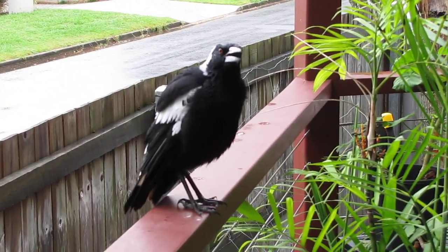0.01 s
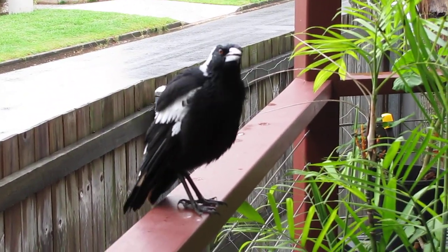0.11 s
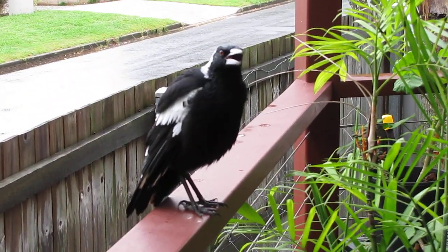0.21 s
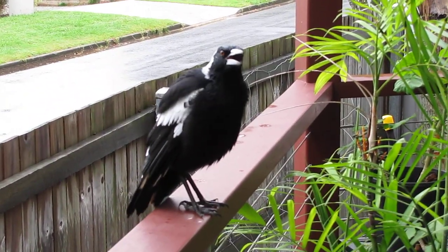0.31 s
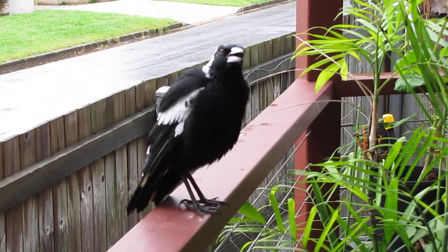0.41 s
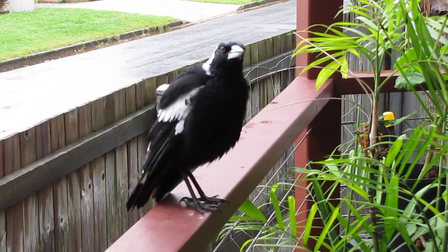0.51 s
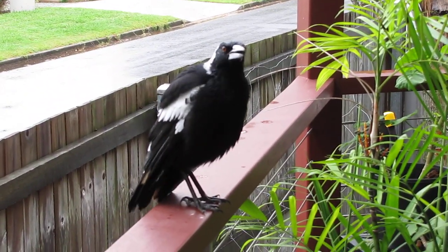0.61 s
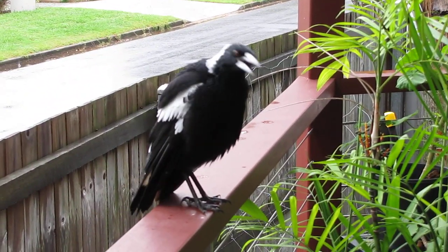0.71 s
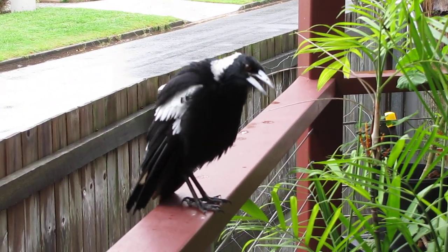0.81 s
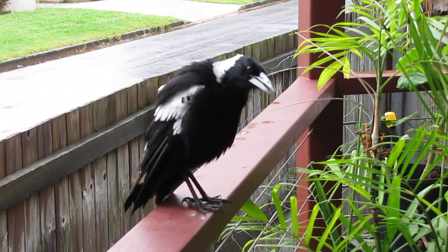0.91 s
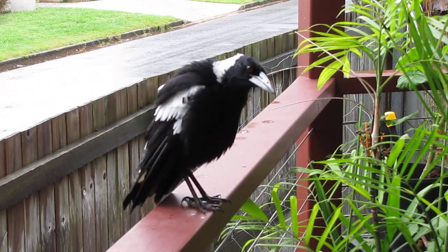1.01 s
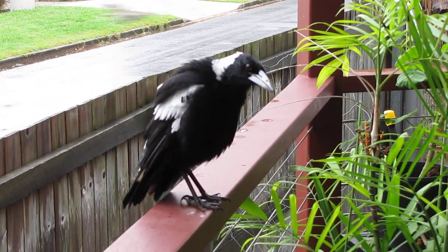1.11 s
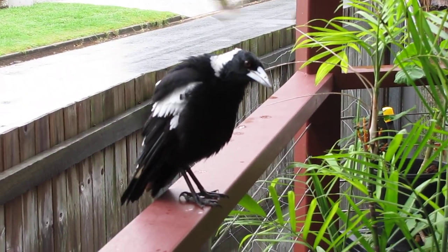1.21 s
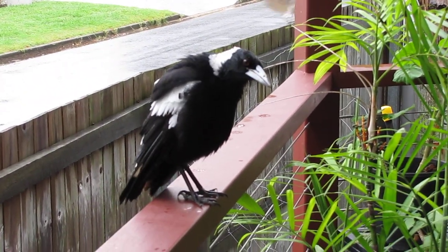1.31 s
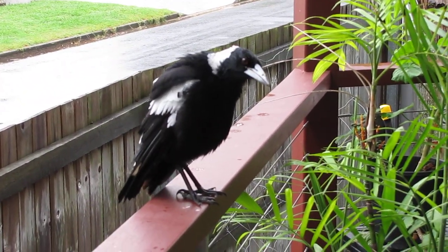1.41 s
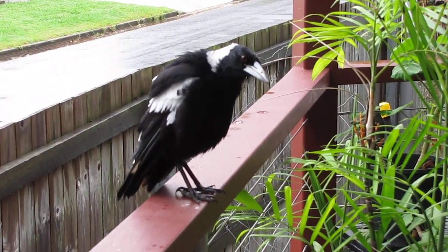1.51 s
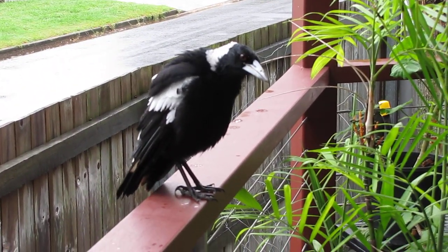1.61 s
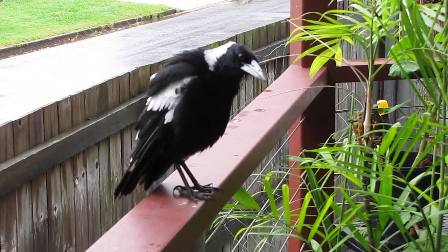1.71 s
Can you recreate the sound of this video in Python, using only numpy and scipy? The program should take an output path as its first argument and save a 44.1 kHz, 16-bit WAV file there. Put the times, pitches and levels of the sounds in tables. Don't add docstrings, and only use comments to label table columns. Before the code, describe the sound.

A magpie close by gives two loud falling whistles after the fading tail of a harsh call; then a further bird answers with four quiet rising chirps amid drips, light rain and distant traffic, in stereo outdoors.

```python
import sys
import numpy as np
from scipy import signal
from scipy.fft import rfft, irfft, next_fast_len
from scipy.io import wavfile
from scipy.ndimage import uniform_filter1d, map_coordinates

SR = 44100
rng = np.random.default_rng(int(sys.argv[2]) if len(sys.argv) > 2 else 0)


def to_wav(s):
    ch = np.atleast_2d(s).T
    pcm = np.round(np.clip(ch, -1, 1) * 32767)
    wavfile.write(sys.argv[1], SR, pcm.astype(np.int16))


def gain_from_db(level_db):
    decades = np.asarray(level_db, float) / 20
    return 10 ** decades


N = 79380


def unit(x):
    return x / np.sqrt(np.mean(x ** 2) + 1e-20)


def along(points, hz):
    f, value = np.transpose(points)
    return np.interp(np.log(hz + 1), np.log(f + 1), value)


def wobble(rate):
    return map_coordinates(rng.standard_normal(800), [np.arange(N) * rate / SR], mode="wrap")


def filtered(x, response):
    m = next_fast_len(N + SR // 2)
    return irfft(rfft(x, m) * response(np.fft.rfftfreq(m, 1 / SR)), m)[..., :N]


def cycles(hz):
    return 2 * np.pi * np.cumsum(hz) / SR


# f/Hz, level/dB per Hz
BREATH = [(900, -18), (2000, -3.5), (3500, -3), (5900, 0), (7500, -6), (12500, -18.5), (14500, -24),
          (16000, -36)]


def breath_noise():
    return unit(filtered(rng.standard_normal(N), lambda f: gain_from_db(along(BREATH, f))))


# t/s, f/Hz, level/dB, breath level/dB
NOTES = [
    [(0.172, 2438, -30, -39), (0.18, 2407, -22.5, -20), (0.2, 2389, -25.5, -14.5),
     (0.234, 2399, -16.5, -31), (0.258, 2338, -10.5, -34.5), (0.318, 2265, -11.5, -30.5),
     (0.342, 2189, -11.5, -47), (0.368, 2130, -12.5, -50)],
    [(.37, 2097, -22.5, -45), (.383, 2049, -12.5, -41), (.392, 2019, -9, -46), (.402, 2006, -11.5, -51),
     (.417, 1950, -13.5, -55), (.426, 1949, -12.5, -54), (.433, 1929, -24, -42), (.437, 1940, -46, -40)],
    [(.627, 2420, -32.5, -17), (.636, 2379, -32, -20), (.642, 2370, -38, -8), (.65, 2343, -25, -23),
     (.668, 2330, -21.5, -23), (.695, 2300, -18.5, -49), (.735, 2239, -14.5, -54), (.76, 2199, -12.5, -55),
     (.766, 2112, -20.5, -45)],
    [(.773, 2156, -10.5, -50), (.783, 2139, -12, -38), (.789, 2110, -14.5, -50), (.796, 2122, -17.5, -41),
     (.805, 2100, -16, -46), (.815, 2029, -20, -34), (.822, 1976, -13.5, -44), (.834, 2021, -16.5, -32),
     (.846, 2034, -17.5, -45)],
    [(.852, 2011, -12.5, -51), (.866, 1994, -18, -52), (.888, 1964, -10, -48), (.903, 1929, -12, -54),
     (.911, 1866, -20.5, -40), (.919, 1839, -25, -44), (.926, 1850, -32, -43)],
]
# f/Hz, level/dB
THROAT = [(2600, -0.5), (3900, -26), (4400, -16.5), (4750, -9.5), (5850, -15), (6200, -10.5), (7000, -22.5),
          (9500, -31), (15500, -38.5)]
# f/Hz of the pitch, share [1]
BEAT = [(1940, .08), (2010, .15), (2080, .25), (2150, .25), (2210, .03), (2400, .04)]
BEAT_HZ, BEAT_SPREAD_HZ, BEAT_PULL = 95, 35, .6
WAVER_HZ, OVERTONE_DB, PULSE, GUST_DB = 18, 2.5, .8, 3.5
BRIGHTEN, FULL_DB = .05, -13


def whistles():
    t = np.arange(N) / SR
    s, *columns = np.concatenate(NOTES).T
    hz, db, breath_db = [np.interp(t, s, column) for column in columns]
    on = sum((t > first[0][0]) & (t < last[-1][0]) for first, last in [NOTES[:2], NOTES[2::2]])
    beat = 1 + along(BEAT, hz) * np.exp(1j * cycles(BEAT_HZ + BEAT_SPREAD_HZ * wobble(40)))
    phase = cycles(hz + WAVER_HZ * wobble(240)) + BEAT_PULL * np.angle(beat)
    stack = 0
    for k in range(1, 8):
        effort_db = (k - 2.5) * BRIGHTEN * (db - FULL_DB)
        unsteady_db = (k > 1) * OVERTONE_DB * wobble(150)
        stack = stack + gain_from_db(along(THROAT, k * hz) + effort_db + unsteady_db) * np.sin(k * phase)
    breath = gain_from_db(breath_db) * breath_noise() * (1 + PULSE * np.cos(phase)) * gain_from_db(GUST_DB * wobble(260))
    gate = uniform_filter1d(on * 1., size=130)
    return gate * gain_from_db(db) * (np.sqrt(2) * np.abs(beat) * stack + breath)


# t/s, length/s, from f/Hz, to f/Hz, level/dB
SQUEAKS = [
    (.144, .028, 2250, 1980, -33),
    (.153, .021, 3250, 2650, -33),
    (.588, .026, 2230, 1930, -41),
    (.592, .039, 3180, 2600, -43),
]
LOW_SIDE_DB = [0, -11.5, -18]
HIGH_SIDE_DB = [0.5, -3.5, -37, -39]
SQUEAK_ROUGH_DB, SQUEAK_AIR_DB, SQUEAK_SUM_DB = 3, -16, -4.5
SQUEAK_HOLD, SWELL = 2, .45


def squeaks():
    t, sides, swell = np.arange(N) / SR, np.zeros((2, N)), np.zeros(N)
    for row, (s, length, from_hz, to_hz, db) in enumerate(SQUEAKS):
        u = np.clip((t - s) / length, 0, 1)
        phase = cycles(from_hz + (to_hz - from_hz) * u ** SQUEAK_HOLD + 55 * wobble(400))
        tone = 0
        for k, partial_db in enumerate(HIGH_SIDE_DB if row % 2 else LOW_SIDE_DB):
            tone = tone + gain_from_db(partial_db + SQUEAK_ROUGH_DB * wobble(180.1)) * np.sin((k + 1) * phase)
        shape = gain_from_db(db) * np.sin(np.pi * u) ** SWELL
        sides[row % 2] += np.sqrt(2) * shape * tone
        swell += shape
    product = sides[0] * sides[1] / (swell + 1e-6)
    sum_tone = filtered(product, lambda f: (f > 4500) & (f < 9500))
    air = gain_from_db(SQUEAK_AIR_DB) * swell * breath_noise()
    return sides.sum(axis=0) + gain_from_db(SQUEAK_SUM_DB) * sum_tone + air


# t/s, f/Hz, level/dB, overtone level/dB
CHIRPS = [
    [(1.216, 1750, -45, -13), (1.223, 1900, -47, -20), (1.231, 2550, -39.5, -10.5),
     (1.236, 2850, -46.5, 0.5), (1.245, 3280, -38.5, -13.5), (1.252, 3480, -47, -12),
     (1.258, 3540, -47, -1.5), (1.266, 3500, -52, -2)],
    [(1.333, 1800, -47, -1), (1.339, 1550, -45, -8), (1.345, 1950, -49, -18), (1.351, 2600, -44, -21),
     (1.357, 2950, -56, -4), (1.367, 3300, -37.5, -22), (1.374, 3500, -52, 1), (1.381, 3800, -38, -5.5),
     (1.396, 3940, -49, -3)],
    [(1.472, 3100, -48, -20), (1.477, 3000, -45, -15), (1.483, 2950, -51, -20), (1.484, 1850, -48, -14),
     (1.491, 2500, -38, -21), (1.496, 2750, -48, -7), (1.503, 3020, -41, -14), (1.513, 3150, -52, -12)],
    [(1.516, 3350, -47, -6), (1.522, 3550, -50, 0), (1.528, 3640, -41, -9.5), (1.536, 3660, -54, -10.5)],
    [(1.624, 1930, -61, 0), (1.632, 1860, -53, -3), (1.641, 1620, -47.5, 7.5), (1.648, 1900, -56.5, 12),
     (1.652, 2350, -30, -26), (1.655, 2650, -48, 1), (1.66, 2900, -35, -15.5), (1.669, 3250, -46, -12)],
    [(1.67, 3300, -42, 4), (1.677, 3500, -46, -13), (1.685, 3570, -41, -6.5), (1.693, 3570, -41.5, -13),
     (1.7, 3550, -57, -9)],
]
CHIRP_OVER_DB = [3, -8.5, -19]
CHIRP_JITTER_HZ, CHIRP_ROUGH_DB = 25.7, 1.5
CHIRP_VEIL_DB = -5


def chirps():
    t = np.arange(N) / SR
    s, *columns = np.concatenate(CHIRPS).T
    hz, db, over_db = [np.interp(t, s, column) for column in columns]
    on = sum((t > c[0][0]) & (t <= c[-1][0] + .001) for c in CHIRPS) > 0
    phase = cycles(hz + CHIRP_JITTER_HZ * wobble(400))
    tone = np.sin(phase)
    for k, partial_db in enumerate(CHIRP_OVER_DB, start=2):
        rough_db = 2 * CHIRP_ROUGH_DB * wobble(260)
        tone = tone + gain_from_db(over_db + partial_db + CHIRP_VEIL_DB + rough_db) * np.sin(k * phase)
    gate = uniform_filter1d(on * 1., size=90)
    return gate * np.sqrt(2) * gain_from_db(db + CHIRP_ROUGH_DB * wobble(200)) * tone


# f/Hz, width/Hz, level/dB
EARLIER = [(1403, 208, -5), (2470, 144, 0.5), (2740, 220, 2.5), (3870, 170, -16), (5870, 770, -16),
           (6960, 3500, -28), (11000, 4700, -41.5)]
EARLIER_DB, FAST_T60, SLOW_T60, SLOW_DB = -21, 0.086, 0.49, -8


def earlier_call():
    t = np.arange(N) / SR
    bands = lambda f: sum(gain_from_db(db) / (1 + (2 * (f - centre) / width) ** 2) for centre, width, db in EARLIER)
    noise = rng.standard_normal((3, N))
    ring = unit(filtered(noise[0] + 1.19 * noise[1:], bands))
    return gain_from_db(EARLIER_DB) * ring * (gain_from_db(-60 * t / FAST_T60) + gain_from_db(SLOW_DB - 60 * t / SLOW_T60))


# t/s, peak level/dB, body f/Hz
DRIPS = [(1.001, -41.5, 3040), (1.026, -49, 2400), (1.19, -63, 2940), (1.3094, -40.5, 2900),
         (1.334, -44, 2500), (1.3777, -43.5, 3000), (1.4503, -39, 2950), (1.7292, -40, 3100),
         (1.738, -44, 3000)]
# t/s, f/Hz, level/dB
PLOPS = [(1.376, 1250, -43), (.886, 550, -40), (0.887, 1410, -35.5), (1.007, 1290, -44),
         (1.405, 587, -38.5), (1.73, 1490, -37.5), (1.738, 690, -35.5)]
SPLASH_HZ = 5500


def drips():
    out, t = np.zeros(N + SR), np.arange(SR // 10) / SR
    for s, db, body_hz in DRIPS:
        decay = gain_from_db(-60 * t / 0.0097) + 0.35 * gain_from_db(-60 * t / 0.14)
        splash = rng.standard_normal(len(t)) * (1 - np.exp(-t / 0.0015)) * decay
        body = gain_from_db(-60 * t / 0.0038) * np.sin(2 * np.pi * body_hz * t)
        out[round(s * SR):][:len(t)] += gain_from_db(db + 8.5) * (splash + body)
    for s, hz, db in PLOPS:
        envelope = gain_from_db(db - 60 * t / 0.028) * (1 - np.exp(-t / 0.00078))
        out[round(s * SR):][:len(t)] += envelope * np.sin(2 * np.pi * hz * t * (1 + 4 * t))
    return filtered(out[:N], lambda f: 1 / (1 + 1j * f / SPLASH_HZ) ** 2)


# f/Hz, likeness [1]
ALIKE = [(60, 0.98), (240, 0.98), (950, 0.88), (3770, 0.21), (15000, 0.042)]


def rush(spectrum, patchy_db):
    z = signal.stft(rng.standard_normal((2, N)), nperseg=512)[2]
    field = uniform_filter1d(uniform_filter1d(rng.standard_normal(z.shape[1:]), 6, 0), 10, 1)
    pair = signal.istft(z * gain_from_db(patchy_db * unit(field)), nperseg=512)[1][:, :N]
    turn = lambda hz: np.arccos(np.clip(along(ALIKE, hz), -1, 1)) / 2
    share = lambda hz: gain_from_db(along(spectrum, hz)) * [np.cos(turn(hz)), np.sin(turn(hz))]
    mid, side = filtered(pair, share)
    return unit(np.array([mid + side, mid - side]))


# t/s, level/dB
AIR = [(0.0, -53.5), (0.21, -49), (0.4, -51.5), (0.576, -54), (0.806, -49.5), (1.0, -51), (1.12, -53),
       (1.262, -50), (1.8, -47.5)]
# f/Hz, level/dB per Hz
RUMBLE = [(12, -41), (20, 1.5), (123, -4.5), (155, -4), (258, -9.5), (329, -17), (500, -32.5), (650, -18),
          (1100, -120)]
# f/Hz, level/dB per Hz
RAIN = [(180, -45), (300, -7), (1540, -3.5), (1730, -3.5), (1910, -1), (2290, -6), (3700, -10),
        (5870, -14.5), (15600, -31)]
RAIN_OVER_DB, PATTER_DB, PATTER_RATE = -1, -12, 900


def weather():
    db = np.interp(np.arange(N) / SR, *np.transpose(AIR))
    hits = (rng.random((2, N)) < PATTER_RATE / SR) * gain_from_db(2 * rng.exponential(size=(2, N)))
    ping = lambda f: (1j * f * 4000 / (4000 ** 2 - f * f + 1j * f * 4000)) ** 2
    patter = unit(filtered(hits, ping))
    rain = gain_from_db(RAIN_OVER_DB + 0.67 * wobble(7.7)) * (rush(RAIN, patchy_db=1.0) + gain_from_db(PATTER_DB) * patter)
    traffic = gain_from_db(-2.5 + 0.26 * wobble(2.8)) * rush(RUMBLE, patchy_db=0.5)
    return gain_from_db(db + [[-.3], [.3]]) * (traffic + rain)


# delay t/s, level/dB
WALLS = [(.004, -21), (.011, -26), (.019, -29), (.027, -30)]


def walls(x):
    return filtered(x, lambda f: sum(gain_from_db(db) * np.exp(-2j * np.pi * f * s) for s, db in WALLS))


# f/Hz, t60/s
YARD = [(1000, .13), (2000, .38), (4000, .3), (6000, .27), (9000, .32), (14000, .27)]
BUILD_S, SHIMMER_DB = .012, 2.2


def yard(x, scale=1):
    hz, t, z = signal.stft(rng.standard_normal((3, SR // 2)), SR, nperseg=256)
    rise = 1 - np.exp(-t / BUILD_S)
    decay = gain_from_db(-60 * t / scale / along(YARD, hz)[:, None])
    noise = signal.istft(z * rise * decay, SR, nperseg=256)[1]
    tail = noise[0] + 0.83 * noise[1:]
    echo = signal.fftconvolve(x[None], tail / np.linalg.norm(tail[0]), axes=1)[:, :N]
    return gain_from_db(SHIMMER_DB * wobble(120)) * echo


# f/Hz, level/dB
SIDES = [(300, 0), (2000, -1), (2200, -4.5), (2450, -2.5), (4500, 2.5), (6000, 3), (6900, -5), (12000, 2)]
# f/Hz, phase/rad
LEADS = [(1900, -0.14), (2400, -0.56), (3270, -0.7), (4220, 1.5), (6030, -0.3), (7840, 2), (9470, -1.5),
         (12100, 0.7), (15200, 0.5)]


def ports(x):
    half = np.array([[.5], [-.5]])
    return filtered(x, lambda f: gain_from_db(half * along(SIDES, f)) * np.exp(1j * half * along(LEADS, f)))


# f/Hz, level/dB
ECHO_TILT = [(2000, 1), (6000, 4), (8000, 0.5), (13000, 1)]
ECHO_DB, CHIRP_WET_DB = -18, -9
CHIRP_TAIL = .5


def scene():
    bird, far, drop = whistles() + squeaks(), chirps(), drips()
    bright = filtered(bird, lambda f: gain_from_db(along(ECHO_TILT, f)))
    near = ports(bird + walls(bird)) + gain_from_db(ECHO_DB) * yard(bright)
    distant = far + gain_from_db(CHIRP_WET_DB) * yard(far + drop, CHIRP_TAIL)
    return near + distant + drop * gain_from_db([[-.7], [.7]]) + earlier_call() + weather()


def roll_off(x):
    return signal.sosfilt(signal.butter(12, 15710, fs=SR, output="sos"), x)


def record(dry):
    mix = filtered(dry, lambda f: (f < 15700) * f ** 2 / (f ** 2 + 25 ** 2))
    return roll_off(mix)


dry = scene()
out = record(dry)
to_wav(out)
```